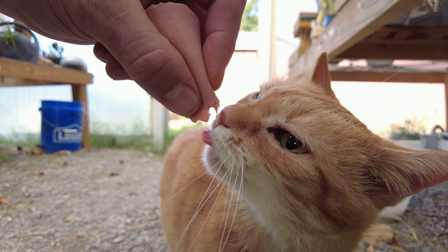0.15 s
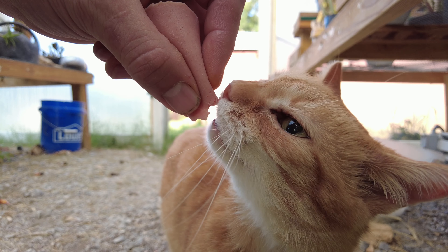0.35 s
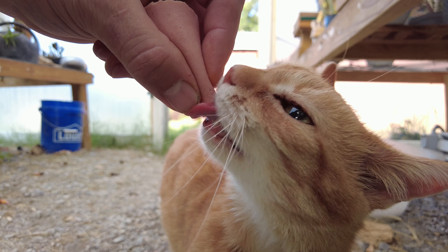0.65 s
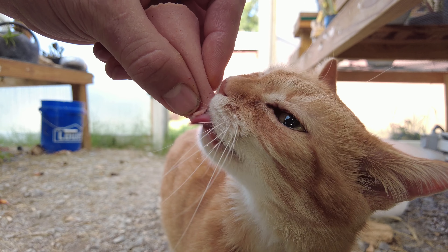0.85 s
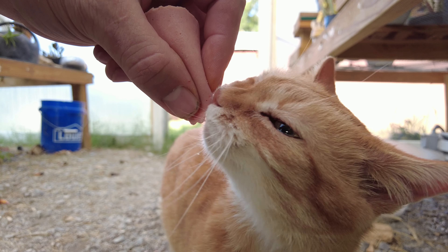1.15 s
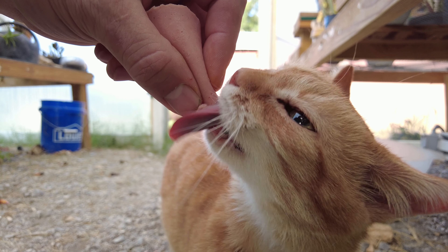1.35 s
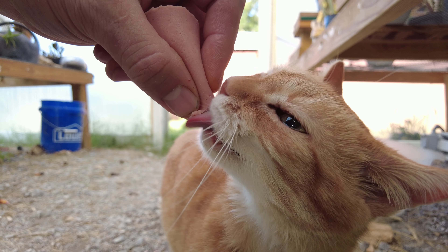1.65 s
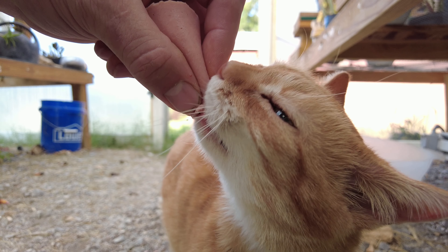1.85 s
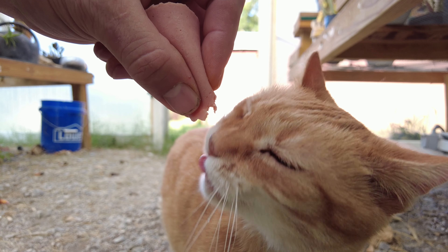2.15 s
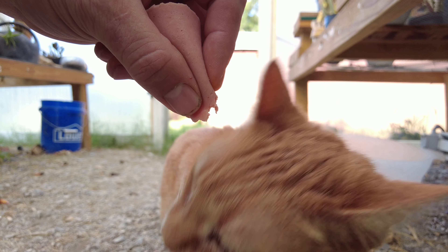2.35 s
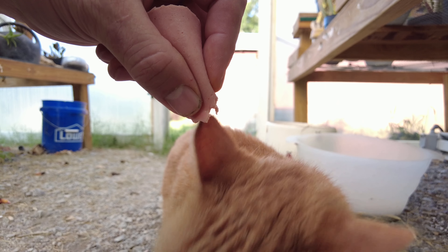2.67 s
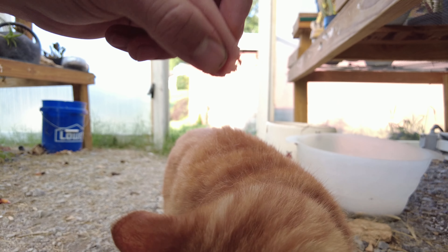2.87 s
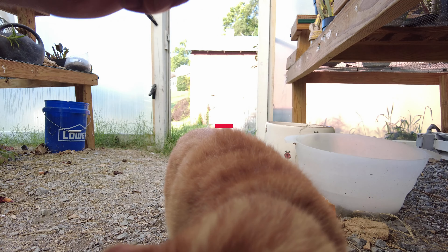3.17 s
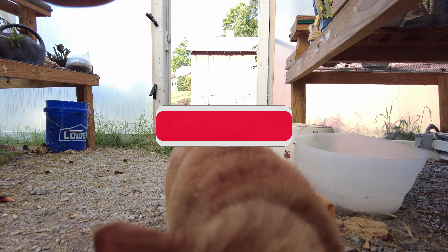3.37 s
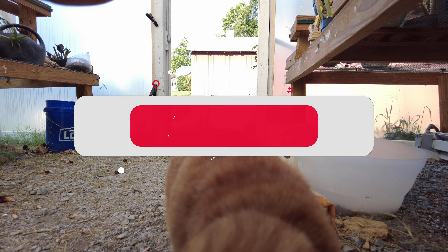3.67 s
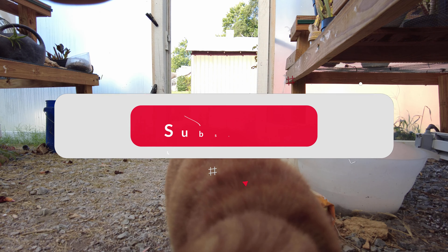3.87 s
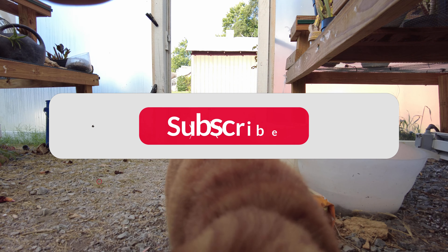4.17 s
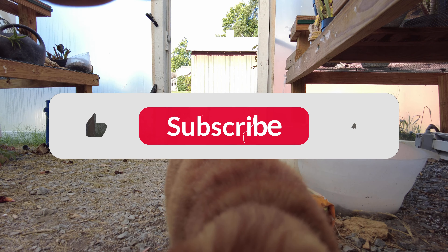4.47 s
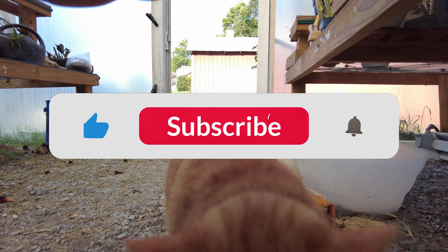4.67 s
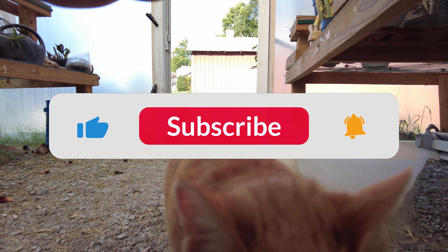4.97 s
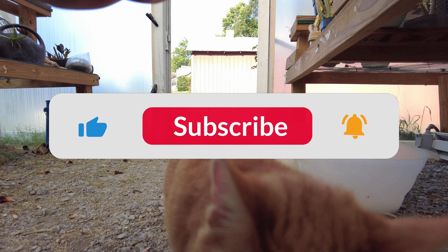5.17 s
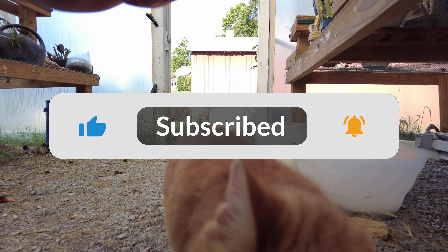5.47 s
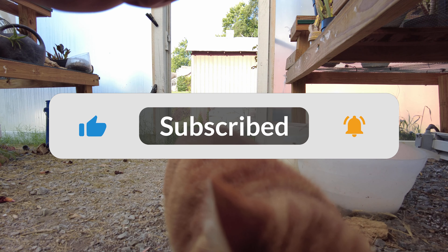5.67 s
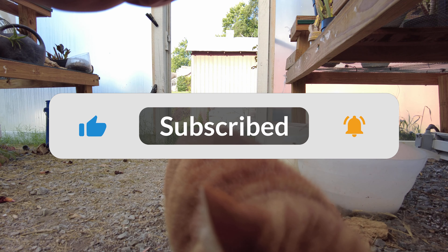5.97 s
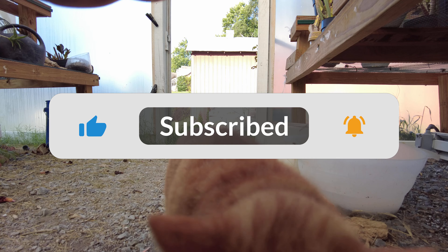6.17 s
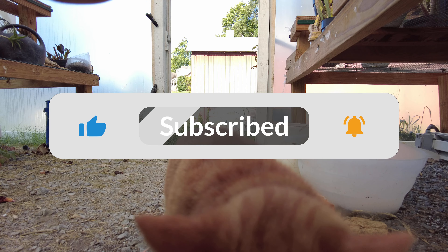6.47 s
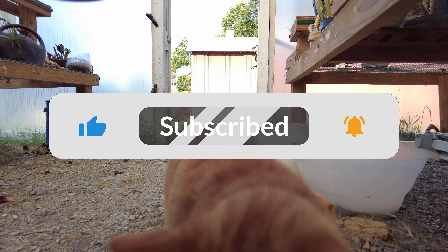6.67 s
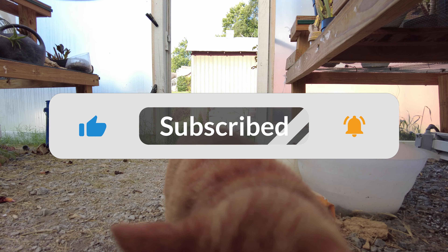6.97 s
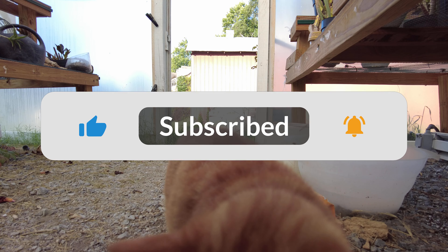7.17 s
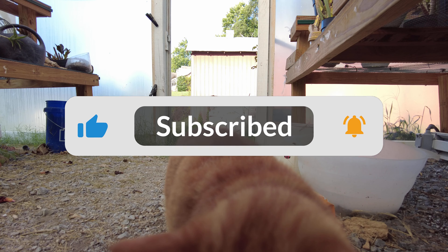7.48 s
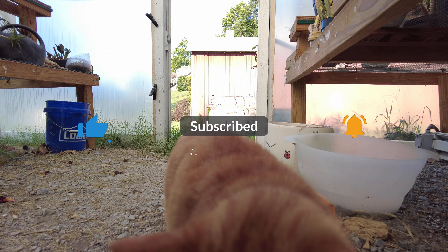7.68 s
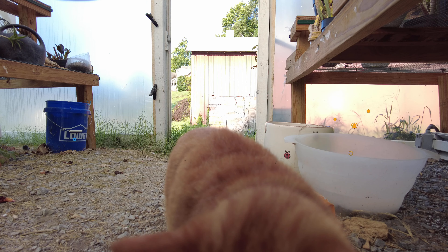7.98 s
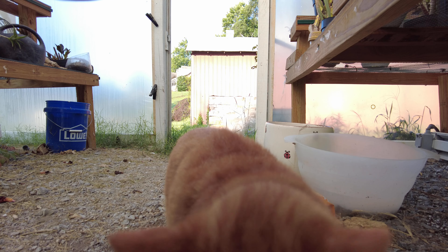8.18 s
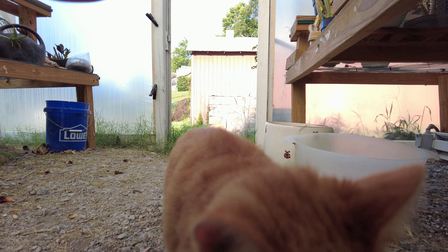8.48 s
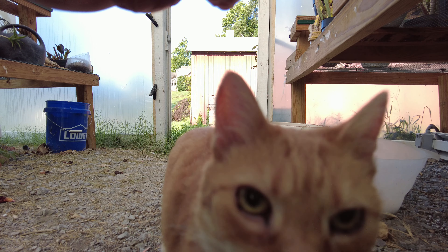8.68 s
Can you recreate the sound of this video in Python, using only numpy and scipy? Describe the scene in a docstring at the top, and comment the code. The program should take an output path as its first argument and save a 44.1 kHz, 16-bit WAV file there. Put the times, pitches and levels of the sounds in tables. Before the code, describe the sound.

Close raspy cat licks, then moist chewing snaps and tiny crunches, with fur brushing softly, faint low rumble, crickets and a far falling bird whistle.

```python
"""Cat licking a treat by a greenhouse

A cat licks a soft treat from fingers right at the microphone, then chews it on the ground of a greenhouse.
Tongue, bites and fur are swarms of tiny snaps through gliding resonances; smacks and ticks are bursts ringing
in short resonances. A low rumble and rustle are shaped noise, a far hum is a few wavering tones. Outside, two
crickets trill as pulsed tones over a hissing insect chorus and air, both shaped noise; a distant bird repeats
a falling whistle and others chirp, as gliding tones."""
import sys
import numpy as np
from scipy import signal
from scipy.fft import rfft, irfft, next_fast_len
from scipy.io import wavfile
from scipy.ndimage import uniform_filter1d

SR = 44100
rng = np.random.default_rng(int(sys.argv[2]) if len(sys.argv) > 2 else 0)


def unload_audio(sound):
    """Save the sound as a 16-bit wav file, at the path given as the first command line argument."""
    columns = np.transpose(np.atleast_2d(sound))
    # keep every value between -1 and 1, then stretch to whole-number steps
    steps = np.round(np.clip(columns, -1, 1) * 32767)
    wavfile.write(sys.argv[1], SR, steps.astype(np.int16))


N = 389403
TIME = np.arange(N) / SR


def from_db(db):
    """Amplitude factor of a level in dB."""
    return 10 ** (np.asarray(db) / 20)


def rms_one(x):
    """Scale a sound to rms 1."""
    return x / np.sqrt(np.mean(x ** 2) + 1e-20)


def loudest(x):
    """Level of the strongest two milliseconds."""
    return np.sqrt(uniform_filter1d(x ** 2, size=88).max())


def in_time(rows, t=TIME):
    """Each column of a curve, joined by straight lines."""
    s, *columns = np.transpose(rows)
    return [np.interp(t, s, column) for column in columns]


def add(out, s, sound):
    """Mix a sound in at a time."""
    at = max(round(s * SR), 0)
    out[at:at + len(sound)] += sound[:max(N - at, 0)]


def octaves_of(hz, width_hz):
    """Width in octaves of a resonance with the given bandwidth."""
    return 2 * np.arcsinh(width_hz / (2 * hz)) / np.log(2)


def band(x, hz, octaves, order=2):
    """A resonance of given centre and width."""
    edges = [hz * 2 ** (-octaves / 2), hz * 2 ** (octaves / 2)]
    edges = np.clip(edges, [20, 40], [.4 * SR, .45 * SR])
    return signal.sosfilt(signal.butter(order, edges, "band", fs=SR, output="sos"), x)


def gliding(x, hz, width_hz, order=2):
    """A resonance whose centre follows a curve: shift down to zero, smooth, shift back up."""
    carrier = np.exp(2j * np.pi * np.cumsum(hz) / SR)
    smooth = signal.butter(order, min(width_hz / 2, .4 * SR), fs=SR, output="sos")
    return np.real(carrier * signal.sosfilt(smooth, x / carrier))


def noise(colour):
    """Noise with the given spectrum, rms 1."""
    size = next_fast_len(N)
    hz, db = np.transpose(colour)
    bins = np.maximum(np.fft.rfftfreq(size, 1 / SR), 1)
    gain = from_db(np.interp(np.log(bins), np.log(hz), db, left=-90, right=-90))
    return rms_one(irfft(rfft(rng.standard_normal(size)) * gain, size)[:N])


def drift(rate):
    """A random curve of rms 1 with the given number of random points per second."""
    knots = np.arange(0, TIME[-1] + 2 / rate, 1 / rate)
    return rms_one(np.interp(TIME, knots, rng.standard_normal(len(knots))))


def tone(hz, waver_hz):
    """A sine of rms 1 whose pitch trembles quickly."""
    tremble = rms_one(uniform_filter1d(rng.standard_normal(len(hz)), size=128))
    return np.sqrt(2) * np.sin(2 * np.pi * np.cumsum(hz + waver_hz * tremble) / SR)


def scatter(x, t60, wet_db):
    """Direct sound plus a dying cloud of reflections."""
    t = np.arange(int(t60 * SR)) / SR
    tail = rng.standard_normal(len(t)) * from_db(-60 * t / t60) * (t > .002)   # 2 ms of pre-delay
    wet = signal.fftconvolve(x, tail / np.linalg.norm(tail))[:N]
    return (x + from_db(wet_db) * wet) / np.hypot(1, from_db(wet_db))


def crackle(strokes, width_hz, grains_per_s, spread_db, edge_db, trim_db,
            skirt_db=-15, clump_db=1.5, clumps_per_s=170, skirt_ratio=4.15):
    """Each stroke (start_s, level_db, resonance_hz, length_s, rise_s, glide_octaves) is a swarm of tiny snaps
    that swells and dies away in uneven clumps, heard through one gliding resonance with a broad skirt."""
    out = np.zeros(N)
    for s, db, hz, length, rise, glide in strokes:
        n = int(length * SR)
        swell_db = np.interp(np.arange(n) / SR, [0, min(rise, length), length], [edge_db, 0, edge_db])
        knots = rng.standard_normal(int(length * clumps_per_s) + 2)
        clumps = np.interp(np.linspace(0, len(knots) - 1, n), np.arange(len(knots)), knots)
        size_db = spread_db * np.minimum(rng.exponential(1, n), 3)
        sizes = from_db(swell_db + clump_db * clumps + size_db) * rng.choice([-1, 1], n)
        snaps = sizes * (rng.random(n) < grains_per_s / SR)
        snaps = np.pad(snaps, (0, SR // 100))   # room for the last ring
        centre = hz * 2 ** (glide * (np.arange(len(snaps)) / n - .5))
        core = gliding(snaps, centre, width_hz)
        skirt = gliding(snaps, centre, width_hz * skirt_ratio, order=3)
        swarm = core + from_db(skirt_db) * skirt
        add(out, s, from_db(db + trim_db) * swarm * np.sqrt(n / (np.sum(swarm ** 2) + 1e-12)))
    return out


def rumble(start_db=-39, slope_db_per_s=-0.32, attack_s=0.014, decay_s=0.14):
    """Deep lumpy noise, easing as the cat settles, that swells with each puff of air from its movements."""
    # spectrum: (pitch_hz, relative_db_per_hz)
    rumble_colour = [(12, 6.5), (24, -4), (38, -11), (60, -9.5), (100, -20), (160, -29), (300, -43),
                     (800, -82)]
    # air pushed at the microphone: (peak_s, level_db)
    puffs = [(1.77, -34.5), (2.37, -36), (2.73, -34), (3.12, -32.5), (7.034, -30), (8.28, -30)]
    power = from_db(start_db + slope_db_per_s * TIME) ** 2
    for s, db in puffs:
        swell = np.exp(-abs(TIME - s) / np.where(TIME < s, attack_s, decay_s))
        power = power + (from_db(db) * swell) ** 2
    return np.sqrt(power) * noise(rumble_colour)


def hum(waver_db=1.5, wander_hz=1.478):
    """A few low wavering tones, as of far machinery, sharing one swell and one speed."""
    # partials: (pitch_hz, level_db), before swell and speed
    partials = [(130.5, -53), (180, -56), (209, -62), (245, -69)]
    # common swell: (time_s, gain_db)
    swell_curve = [(0, -1.5), (1.2, -0.5), (2, 5), (3, -1.5), (4.3, 2.5), (5.3, -3.5), (6.4, -0.5),
                   (7.3, 4), (8.8, 5.5)]
    # common speed: (time_s, relative_speed)
    speed_curve = [(0, 1.07), (2.2, 0.97), (5, 1.078), (7.5, .995), (8.8, 1)]
    swell_db, = in_time(swell_curve)
    speed, = in_time(speed_curve)
    out = np.zeros(N)
    for hz, db in partials:
        phase = 2 * np.pi * np.cumsum(hz * speed + wander_hz * drift(8)) / SR
        out += from_db(db + swell_db + waver_db * drift(7)) * np.sqrt(2) * np.sin(phase)
    return out


def outdoor_air():
    """The soft outdoor bed: shaped noise, heaviest in the lows."""
    # spectrum: (pitch_hz, relative_db_per_hz)
    air_colour = [(50, -4.5), (90, 5), (140, -0.5), (215, -6.5), (285, -14.5), (400, -17), (520, -23),
                  (750, -27), (1200, -26.5), (2500, -35.5), (4000, -44.5), (9000, -42.5), (12500, -42.5),
                  (13500, -68), (16000, -58)]
    return from_db(-46.5) * noise(air_colour)


def insect_chorus():
    """Many insects blurred into a hiss: noise in a few high bands."""
    # spectrum: (pitch_hz, relative_db_per_hz)
    chorus_colour = [(3900, -48), (4400, 4.5), (4800, 8.5), (5150, 2), (5400, -22), (5900, -7.5),
                     (6300, 5.5), (6750, 11.5), (7200, 8), (7550, 7.5), (8100, -5.5), (8600, -18),
                     (11000, -47)]
    return from_db(-57.5) * noise(chorus_colour)


def cricket(db, hz, sweep_hz, rate, rest_from, rest_until, fade_s,
            wander_hz=45, pace_wander=.04, flutter_db=1.76, rest_db=-21, rest_sag_hz=150.2):
    """Each wing stroke is a short tone that falls as the scraper slows along the file; a rest is weaker, lower."""
    rest_times = [rest_from - fade_s, rest_from, rest_until, rest_until + fade_s]
    resting = np.interp(TIME, rest_times, [0, 1, 1, 0])
    stroke = np.cumsum(rate * (1 + pace_wander * drift(25))) / SR % 1   # position within the stroke
    pitch = hz - rest_sag_hz * resting + sweep_hz * (.5 - stroke)
    trill = rms_one(np.sin(np.pi * stroke) ** 0.88 * tone(pitch, wander_hz))
    level = from_db(db + rest_db * resting ** 2 + flutter_db * drift(45))
    return scatter(level * trill, t60=0.3, wet_db=-6.0)


def crickets():
    """Two crickets, each trilling steadily but for one rest."""
    # (level_db, mid_stroke_hz, fall_over_stroke_hz, strokes_per_s, rest_from_s, rest_until_s, fade_s)
    singers = [(-58, 4585, 600, 59, 6.74, 7.08, .1), (-60.5, 5005, 410, 58, 5.1, 5.6, .55)]
    return sum(cricket(*singer) for singer in singers)


def rustle(grain_db=2.5, trim_db=-2.0):
    """Soft rustle of the moving cat and hand: hairs slide unevenly, so the hiss is grainy."""
    # (time_s, level_db before trim)
    rustle_curve = [(0, -61), (0.6, -55.5), (1.2, -58), (1.45, -58), (2.1, -54), (2.28, -61), (2.45, -55.5),
                    (2.7, -56), (4.7, -57.5), (5.43, -58), (5.75, -60), (6.5, -58.5), (6.85, -60),
                    (7.1, -58), (7.8, -65.5), (8.3, -54), (8.83, -49.5)]
    # spectrum: (pitch_hz, relative_db_per_hz)
    rustle_colour = [(300, -18), (420, 2), (560, 1), (780, -2), (1050, 2.5), (1400, -1), (2400, 2),
                     (3700, -0.5), (5500, -1.5), (8000, -3.5), (15000, -52.5)]
    db, = in_time(rustle_curve)
    return from_db(db + trim_db + grain_db * drift(160)) * noise(rustle_colour)


def bird(waver_hz=48, flutter_db=2.5, wet_db=-0.5, ground_echo=0.76, ground_lag_s=.0036):
    """A far whistle slides down, levels off and ends low; ground echo beads the slide, trees and walls blur it."""
    # falling slide: (time_from_start_s, pitch_hz, relative_db)
    slide = [(0, 4280, -4), (.04, 3920, 1), (.1, 3560, -5), (.135, 3220, 0.5), (.18, 2910, 5.5),
             (.22, 2700, 4.5), (.26, 2550, 3.5), (.33, 2420, -2)]
    # repeats: (start_s, level_db)
    repeats = [(0.222, -68), (0.829, -68), (1.451, -67), (2.075, -65), (2.68, -65.5), (3.315, -62),
               (3.95, -64.5), (4.576, -65), (5.225, -66.5)]
    end_after_s, end_length_s, end_hz, end_fall_hz = 0.29, 0.105, 1650, 128   # low sinking note
    out = np.zeros(N)
    t = np.arange(int(slide[-1][0] * SR)) / SR
    hz, shape_db = in_time(slide, t)
    low = end_hz - np.linspace(0, end_fall_hz, int(end_length_s * SR))
    for s, db in repeats:
        echo_phase = 2 * np.pi * (hz * ground_lag_s + rng.random())
        beads = rms_one(abs(1 + ground_echo * np.exp(1j * echo_phase)))
        fade = signal.windows.tukey(len(t), .1)
        add(out, s, from_db(db + shape_db) * beads * fade * tone(hz, waver_hz))
        low_fade = signal.windows.tukey(len(low), .5)
        add(out, s + end_after_s, from_db(db) * low_fade * tone(low, waver_hz))
    flutter = from_db(flutter_db * drift(40))   # air and leaves make it come and go
    return scatter(out * flutter, t60=0.4, wet_db=wet_db)


def smacks(froth=0.19, run_up_share=0.031, run_up_s=0.0018, upper_ratio=1.734,
           skirt_db=2.0, skirt_hz=1300, body_db=-17, body_hz=400):
    """A brief faint noise rises into each snap, which then froths; mouth resonances ring over a soft jaw knock."""
    # tongue and lips parting: (snap_s, level_db, mouth_resonance_hz, froth_decay_s, overtones_db)
    partings = [(0.533, -41, 2040, 0.00081, -7), (0.541, -43.5, 2280, 0.0009, -12),
                (0.892, -41.5, 3300, .0009, -11), (1.273, -43, 2900, 0.001, -16),
                (1.517, -41.5, 3630, .001, -6), (1.677, -53, 2800, .001, -12),
                (2.642, -36.5, 1400, 0.00052, -2), (2.752, -44.5, 480, 0.0065, -18),
                (2.926, -39, 2490, 0.00069, -7), (3.039, -40, 2220, 0.0011, -22),
                (3.12, -39.5, 2460, .001, -14), (3.197, -42.5, 1320, 0.001, -3),
                (3.379, -46, 2570, .0007, -5), (3.565, -44, 1560, .002, -3), (3.686, -45, 1540, 0.0014, -8),
                (3.808, -40.5, 1350, 0.00069, -14), (3.816, -30.5, 1380, 0.00058, -8),
                (4.139, -45.5, 1370, 0.0061, -4), (4.314, -42.5, 2107, 0.0013, -29),
                (4.485, -50, 1100, 0.0014, -12), (4.665, -38.5, 1170, 0.0011, -13),
                (4.912, -45.5, 1330, 0.00088, -15), (5.232, -46, 1560, 0.006, -18),
                (5.282, -49, 1110, 0.0023, -17), (5.326, -47, 935, .001, -16),
                (5.346, -43.5, 1280, 0.0007, 1), (5.404, -52, 2950, .0007, -6),
                (5.501, -44, 1820, 0.0027, -15), (5.592, -29, 1220, 0.00095, -9.5),
                (5.596, -35, 1460, 0.0011, -19), (5.622, -45, 3050, 0.00087, -9),
                (5.641, -45, 1450, .002, -16), (5.65, -45, 1100, .002, -16),
                (6.168, -26.5, 1965, 0.00019, -25), (6.169, -35, 2500, 0.0011, -18),
                (6.337, -40.5, 1170, .00043, -14), (6.428, -49, 1080, 0.00063, -16),
                (6.444, -39, 1100, 0.0014, -22), (6.514, -44, 1370, .00065, -20),
                (6.685, -49, 2050, .002, -15), (6.746, -51, 1450, .0007, -12),
                (6.778, -42.5, 870, 0.00076, -23), (6.871, -47.5, 1350, 0.0023, -21),
                (6.901, -50, 1340, .001, -15), (6.943, -53, 1100, .001, -14),
                (6.952, -33.5, 1210, 0.00088, -2), (6.976, -42, 1530, .0008, -13),
                (7.181, -40, 4100, 0.00079, -7), (7.234, -39.5, 970, 0.0012, -15),
                (7.519, -46, 2420, .0006, -3), (8.131, -36, 514, 0.0076, -18),
                (8.132, -45.5, 1280, 0.0025, -18), (8.146, -50, 890, .003, -4),
                (8.162, -50, 1490, .002, -15), (8.533, -46, 1090, 0.0018, -1),
                (8.591, -33, 3560, .001, -11), (8.596, -40, 1500, 0.0032, 3), (8.784, -47, 1940, .0018, 9)]
    mouth_width_hz = 670   # one cavity: its pitch changes with the opening, its bandwidth stays
    out, t = np.zeros(N), np.arange(-SR // 100, SR // 20) / SR
    for s, db, hz, decay, overtones_db in partings:
        run_up = run_up_share * np.exp(-abs(t) / run_up_s)
        fizz = np.where(t < 0, run_up, froth * np.exp(-abs(t) / decay))
        burst = (t == 0) + fizz * rng.standard_normal(len(t))
        cavity = rms_one(band(burst, hz, octaves_of(hz, mouth_width_hz), order=3))
        upper = rms_one(band(burst, hz * upper_ratio, 0.3))
        skirt = from_db(skirt_db) * rms_one(band(burst, skirt_hz, 1.7, order=3))
        knock = from_db(body_db) * rms_one(band(burst, body_hz, 0.83))
        pop = cavity + from_db(overtones_db) * (upper + skirt) + knock
        add(out, s + t[0], from_db(db) * pop / loudest(pop))
    return out


def tongue():
    """Licks rasp broad and bright, slips pulse short and wet, squelches sound a narrow band moving with the mouth."""
    # rough tongue drawn over the treat:
    # (start_s, level_db before trim, resonance_hz, length_s, rise_s, glide_octaves)
    licks = [(0.63, -64, 3300, 0.23, 0.088, 0.064), (0.885, -56.5, 3340, 0.038, 0.029, -0.092),
             (1.03, -60.5, 2900, 0.26, 0.21, 0.9), (1.555, -57.5, 3530, 0.083, 0.067, 0.00029),
             (1.99, -58, 3320, 0.2, 0.14, -.6), (2.39, -63.5, 2300, 0.19, .07, -0.33),
             (3.14, -62, 3750, .13, 0.043, .1)]
    # wet tongue sticking and slipping in one quick run: (start_s, level_db before trim, resonance_hz)
    slip_run = [(1.401, -50.5, 2250), (1.435, -50, 2260), (1.469, -42.5, 2130), (1.506, -48, 2200),
                (1.541, -51, 1950), (1.574, -50, 1800)]
    # saliva squeezed out in a lap or a chew:
    # (start_s, level_db before trim, mouth_resonance_hz, length_s, rise_s, glide_octaves)
    squelches = [(0.685, -52, 2080, 0.11, 0.028, -0.031), (0.735, -58, 3630, 0.036, .025, 0.041),
                 (0.81, -59, 3520, .025, .012, 0.041), (1.875, -51, 2290, 0.084, 0.027, -0.27),
                 (3.51, -49, 1600, 0.072, 0.047, -0.075), (3.87, -58, 2350, .045, .022, 0),
                 (3.975, -48.5, 1460, 0.061, .035, -0.22), (4.655, -45.5, 1410, 0.04, 0.035, -0.036),
                 (5.565, -45, 1560, 0.11, 0.04, -0.24), (6.11, -55, 2500, .03, .015, -.1),
                 (6.535, -52, 2210, 0.081, 0.032, -0.26), (7.135, -57, 2200, 0.053, .025, -.15)]
    slip_s, slip_rise_s = 0.018, .012
    slips = [(s, db, hz, slip_s, slip_rise_s, 0) for s, db, hz in slip_run]
    rasp = crackle(licks, width_hz=2050, grains_per_s=1100, spread_db=1.5, edge_db=-6, trim_db=4.0)
    stutter = crackle(slips, width_hz=750, grains_per_s=4000, spread_db=4.0, edge_db=-14, trim_db=-2.0,
                      skirt_db=-25, clump_db=1.0)
    squelch = crackle(squelches, width_hz=274, grains_per_s=1200, spread_db=2.5, edge_db=-11, trim_db=-1.5,
                      skirt_db=-6, clump_db=3.0)
    return rasp + stutter + squelch


def ticks(skirt_db=-9):
    """The smallest saliva films snap high and dry, with a short narrow ring."""
    # (snap_s, level_db, pitch_hz)
    snaps = [(1.2725, -44, 5300), (1.519, -46, 6500), (3.3465, -47, 6340), (4.8664, -42, 5990),
             (5.1537, -40, 6440), (5.404, -55, 5450), (5.5917, -45, 5600), (5.938, -49, 5700),
             (6.1672, -38, 6570), (6.4026, -46, 6600), (7.5192, -42, 6700)]
    out, click = np.zeros(N), signal.unit_impulse(SR // 100)
    for s, db, hz in snaps:
        ringing = rms_one(band(click, hz, .12))
        tick = ringing + from_db(skirt_db) * rms_one(band(click, 8950, 0.29))
        add(out, s, from_db(db) * tick / loudest(tick))
    return out


def bites():
    """The teeth crush the treat; each short wet crunch sounds all resonances of the open jaws."""
    # (start_s, level_db before trim, length_s, rise_s, relative_jaw_pitch, middle_resonance_db)
    crunches = [(2.564, -50.5, 0.022, 0.015, 1.03, -8), (2.6, -49.5, 0.023, 0.015, 0.95, -4),
                (2.637, -42, 0.017, 0.012, 0.95, -0.5), (2.764, -52.5, 0.064, 0.029, .92, -1.5),
                (3.069, -55.5, 0.028, 0.013, 1, 0), (3.095, -47, 0.024, 0.021, 0.87, 2.5),
                (8.238, -43, 0.016, 0.0076, 0.95, 3), (8.424, -40.5, 0.022, .01, 1.05, -7)]
    # low, middle and high jaw resonance: (pitch_hz at relative pitch 1, width_hz, relative_db)
    jaws = [(433, 280, -4.5), (1350, 510, -3.5), (2500, 560, 1)]
    out = np.zeros(N)
    for k, (hz, width_hz, mode_db) in enumerate(jaws):
        strokes = []
        for s, db, length, rise, pitch, middle_db in crunches:
            level_db = db + mode_db + middle_db * (k == 1)
            strokes.append((s, level_db, hz * pitch, length, rise, 0))
        out += crackle(strokes, width_hz, grains_per_s=2000, spread_db=3.5, edge_db=-13, trim_db=-1.0,
                       skirt_db=-21)
    return out


def brushes():
    """At the microphone a graze rubs and hisses, fur sweeps past in a sinking swish, stiff hairs flick brightly."""
    # head and whiskers on the microphone housing: (start_s, rub_db before trim, hiss_db before trim)
    grazes = [(3.076, -51, -58.5), (3.512, -53.5, -57.5), (3.98, -55.5, -61.5)]
    # fur flaring and dying away close by: (start_s, level_db before trim, length_s, rise_s)
    fur_sweeps = [(7.003, -50.5, 0.15, 0.019), (8.198, -48.5, 0.11, 0.045), (8.277, -50.5, 0.15, 0.031)]
    # hairs flicking past: (start_s, level_db before trim, resonance_hz, length_s, rise_s, glide_octaves)
    flicks = [(7.022, -47.5, 4100, .018, 0.0057, .4)]
    graze_s, rub_hz, hiss_hz = 0.057, 405, 8400
    sweep_parts = ((3050, 0), (5160, -6.5))   # swish and the hiss above it: Hz, relative dB
    rubs = [(s, db, rub_hz, graze_s, graze_s / 2, 0) for s, db, _ in grazes]
    hisses = [(s, db, hiss_hz, graze_s, graze_s / 2, 0) for s, _, db in grazes]
    sweeps = [(s, db + part_db, hz, length, rise, -0.11)   # sinking by a fraction of an octave
              for s, db, length, rise in fur_sweeps for hz, part_db in sweep_parts]
    rub = crackle(rubs, width_hz=140, grains_per_s=2200, spread_db=2.5, edge_db=-4, trim_db=-3.0)
    hiss = crackle(hisses, width_hz=3200, grains_per_s=1400, spread_db=2.0, edge_db=-18, trim_db=0.5,
                   skirt_db=-8, clump_db=3.0)
    swish = crackle(sweeps, width_hz=1150, grains_per_s=1300, spread_db=2.0, edge_db=-14.0, trim_db=-0.5,
                    skirt_db=-13)
    flick = crackle(flicks, width_hz=2100, grains_per_s=1700, spread_db=9.0, edge_db=-6, trim_db=-0.5)
    return rub + hiss + swish + flick


def chirps():
    """Other birds' short calls: glides, some pure and some husky, that swell and fade."""
    # (start_s, level_db, middle_hz, length_s, glide_hz_per_s, husky_waver_hz)
    calls = [(3.2, -57, 1980, 0.0515, 6000, 8), (5.13, -56.5, 2385, 0.067, 3500, 150),
             (5.33, -62, 2156, 0.087, -4500, 90), (5.492, -59, 2364, .075, 1000, 90),
             (5.82, -49, 2533, 0.088, 2200, 160), (5.919, -56, 2330, 0.029, -7000, 70),
             (5.975, -64, 2760, 0.09, 500, 80), (6.18, -64, 2160, .14, -1500, 45),
             (7.326, -59.5, 2450, 0.089, 1500, 70), (7.966, -61.5, 1316, 0.18, 2998, 127)]
    out = np.zeros(N)
    for s, db, hz, length, glide, waver_hz in calls:
        t = np.arange(-length / 2, length / 2, 1 / SR)
        add(out, s, from_db(db) * signal.windows.tukey(len(t), .6) * tone(hz + glide * t, waver_hz))
    return scatter(out, t60=0.25, wet_db=-5.0)


def spread(near):
    """Treble opposed between left and right: a steady faint hiss, and hiss bands that swell with the near sounds."""
    # spectrum of the steady hiss: (pitch_hz, relative_db_per_hz)
    width_colour = [(2400, -58), (2700, -13), (4000, -6), (4700, -38), (5600, 17.5), (6800, 1), (7600, -22),
                    (8400, -6), (12500, 5.5), (13500, -23)]
    # hiss bands that follow the near sounds: (pitch_hz, width_octaves, share_db)
    following_hiss = [(3640, 0.2, -5.5), (5500, 0.48, -8.5)]
    side = from_db(-72.5) * noise(width_colour)
    for hz, octaves, share_db in following_hiss:
        power = uniform_filter1d(band(near, hz, octaves, order=4) ** 2, size=512)
        level = np.sqrt(np.maximum(power, 0))
        hiss = rms_one(band(rng.standard_normal(N), hz, octaves, order=4))
        side = side + from_db(share_db) * level * hiss
    return side * np.array([[1], [-1]])


def scene():
    """The cat is close and nearly dry; the insects and birds are outside. Only the treble has some width."""
    low = rumble() + hum()
    outdoors = outdoor_air() + insect_chorus() + crickets() + bird() + chirps()
    fur = rustle() + brushes()
    mouth = scatter(smacks() + tongue() + ticks() + bites(), t60=0.075, wet_db=-11.0)
    return mouth + fur + low + outdoors + spread(mouth + fur)


def record(dry, cutoff_hz=15800):
    """The top is cut steeply by an elliptic low-pass."""
    return signal.sosfilt(signal.ellip(10, .1, 80, cutoff_hz, fs=SR, output="sos"), dry)


dry = scene()
out = record(dry)
unload_audio(out)
```